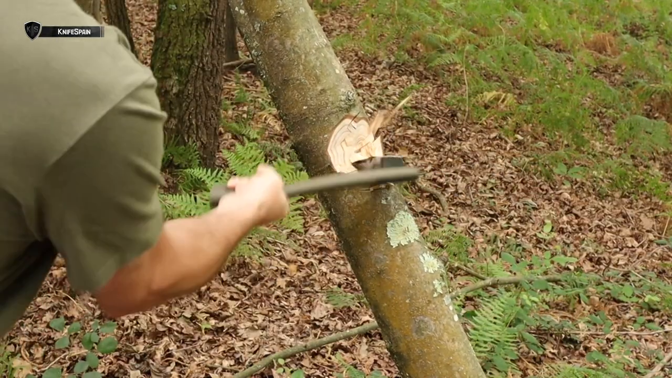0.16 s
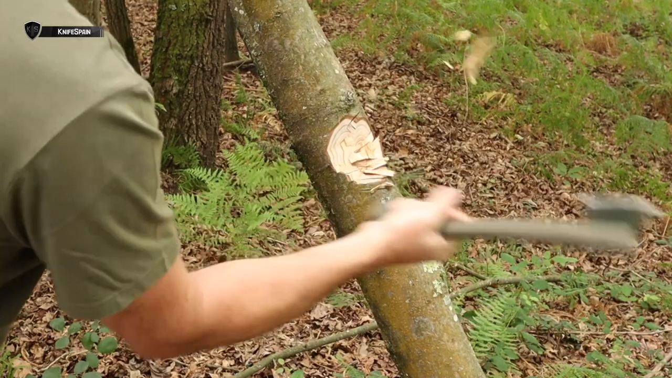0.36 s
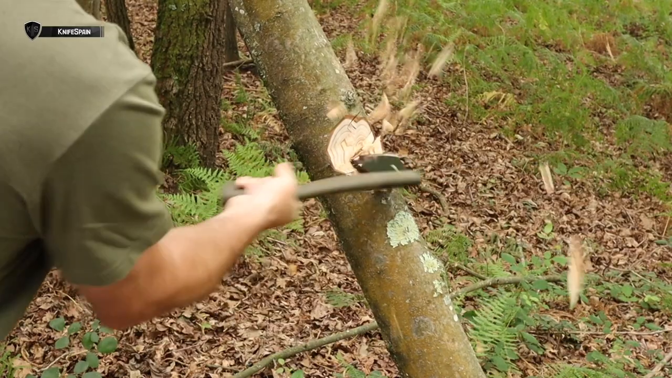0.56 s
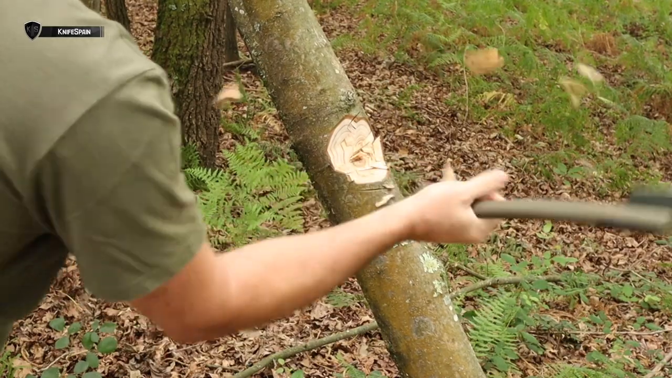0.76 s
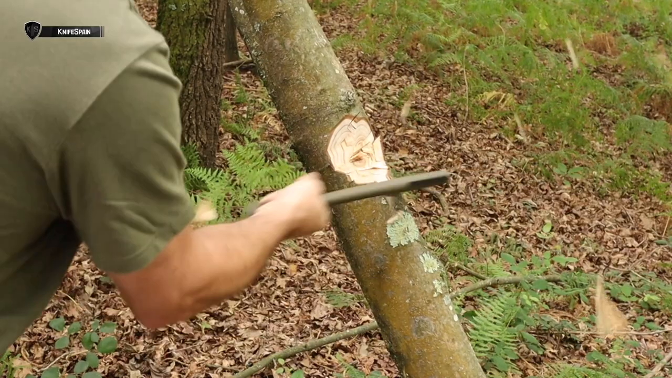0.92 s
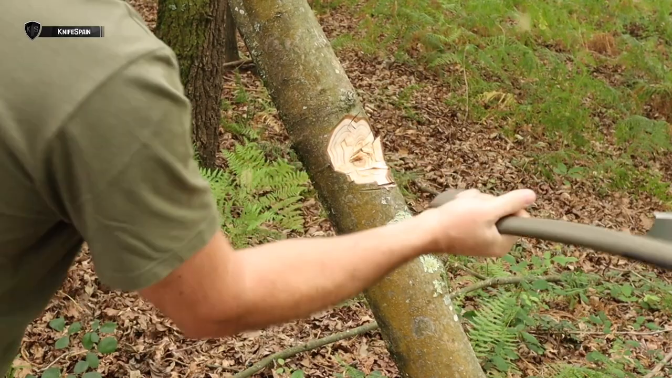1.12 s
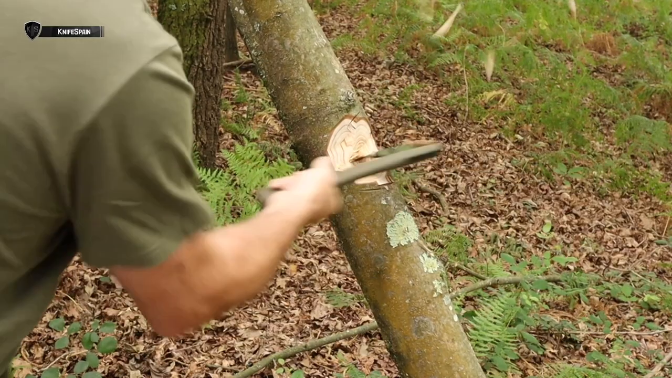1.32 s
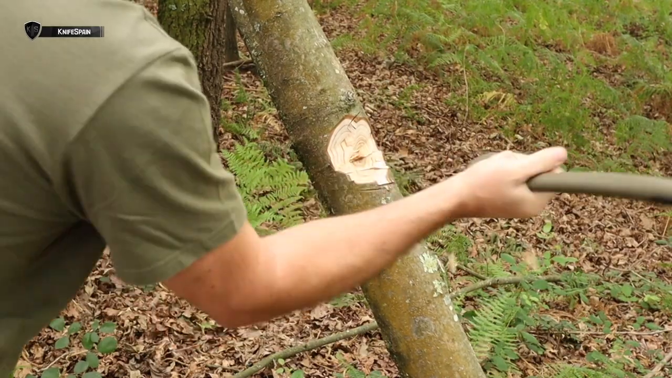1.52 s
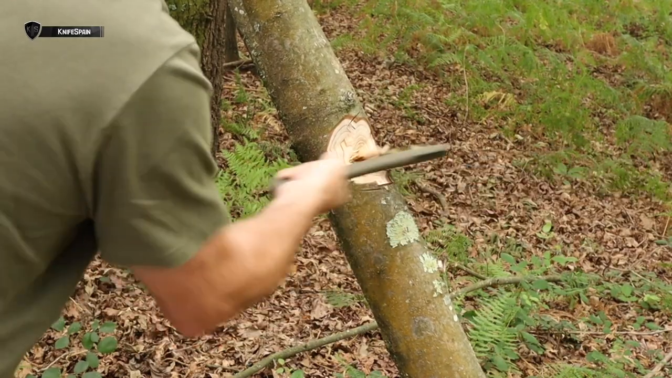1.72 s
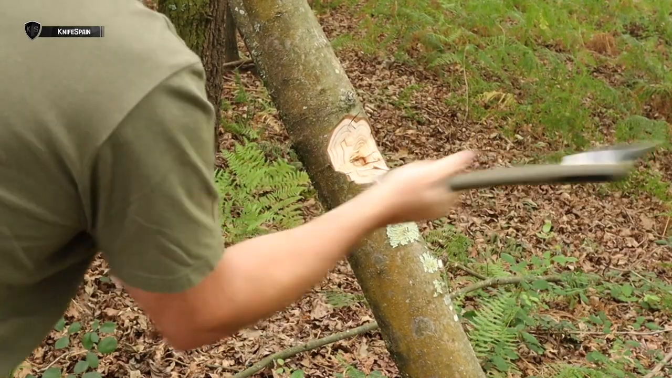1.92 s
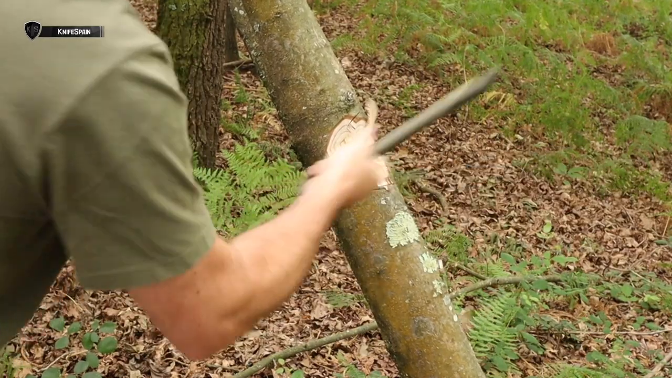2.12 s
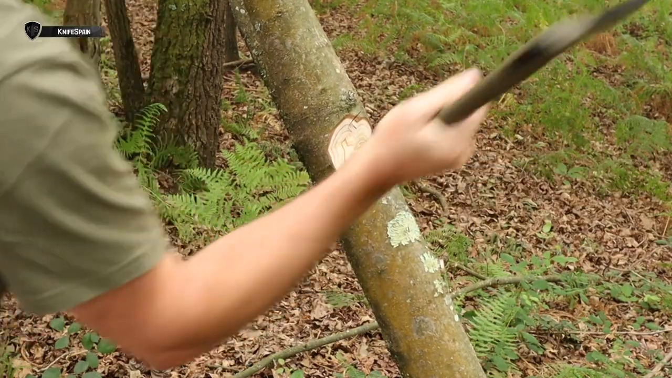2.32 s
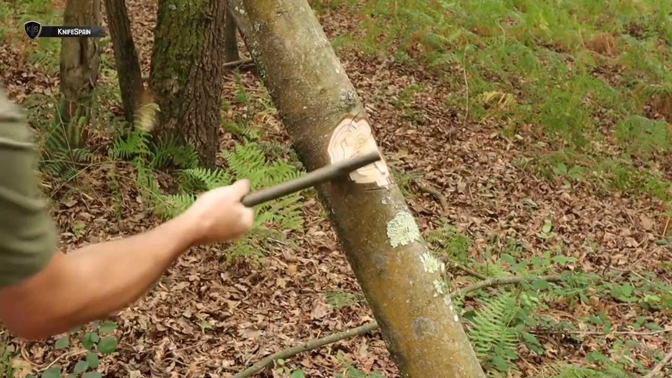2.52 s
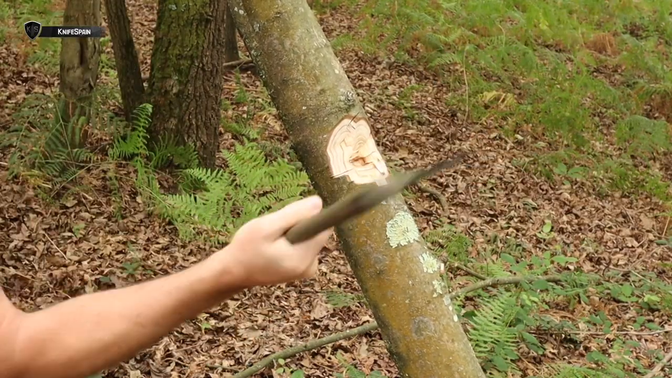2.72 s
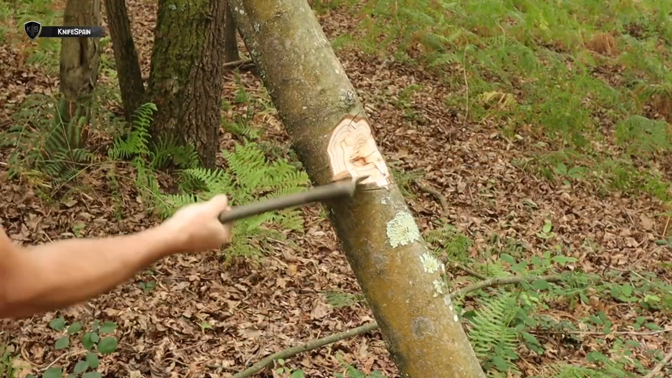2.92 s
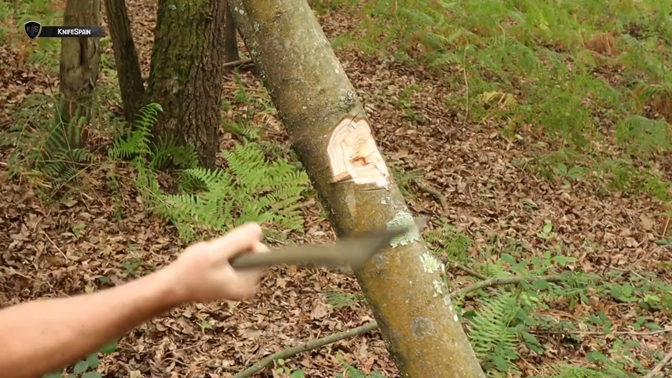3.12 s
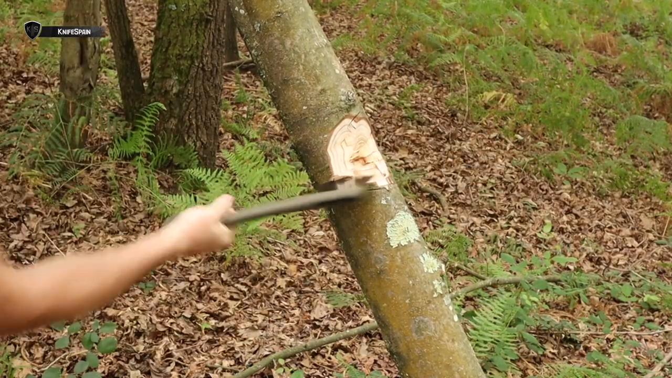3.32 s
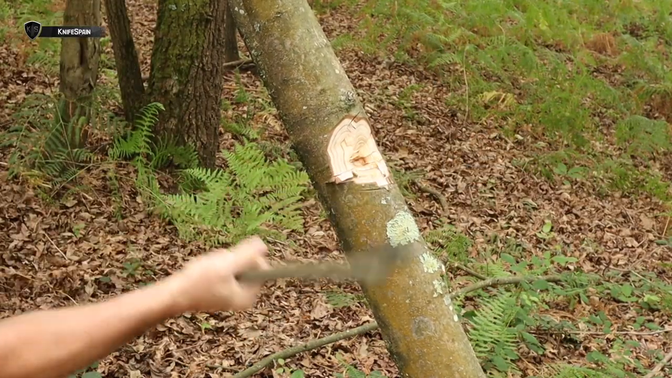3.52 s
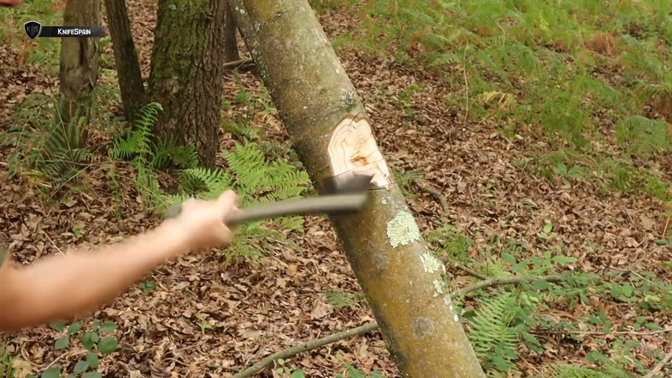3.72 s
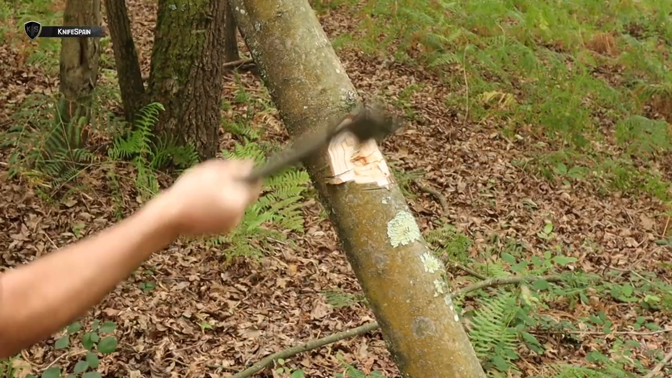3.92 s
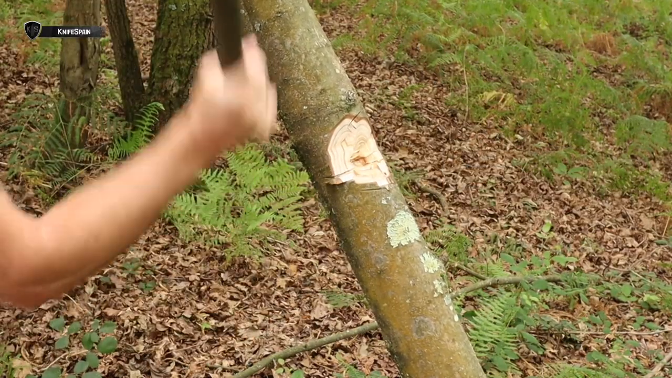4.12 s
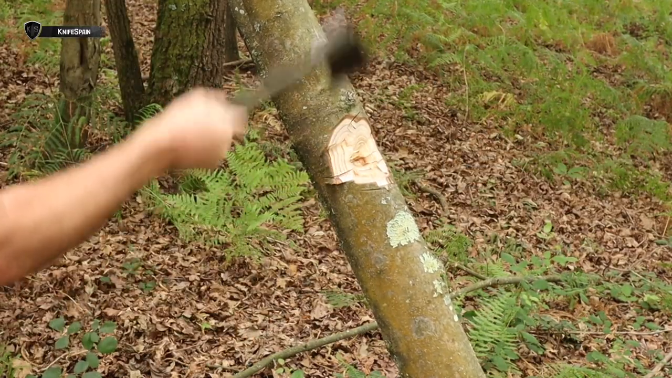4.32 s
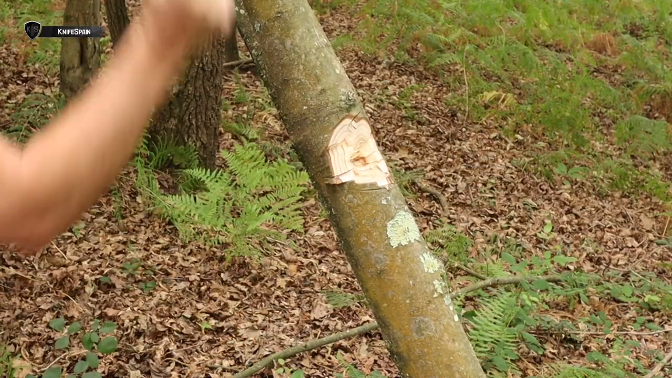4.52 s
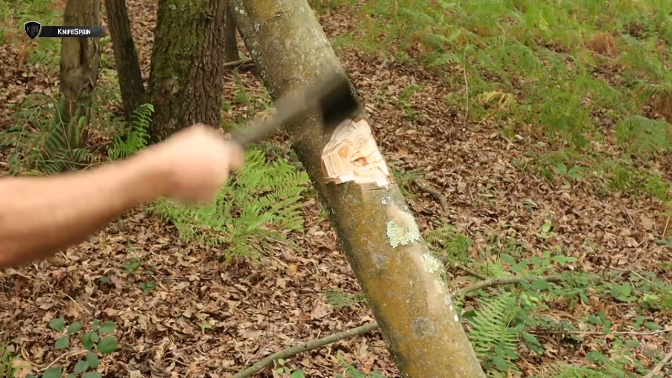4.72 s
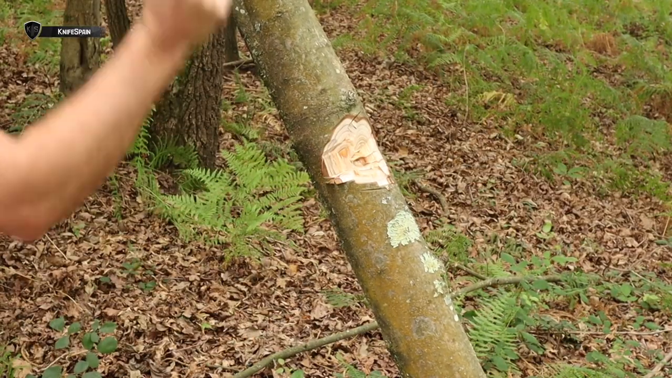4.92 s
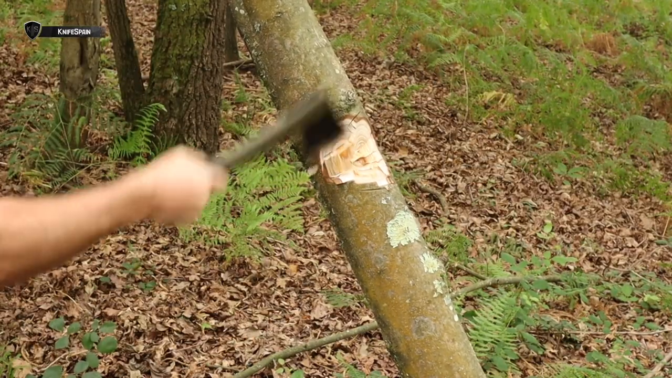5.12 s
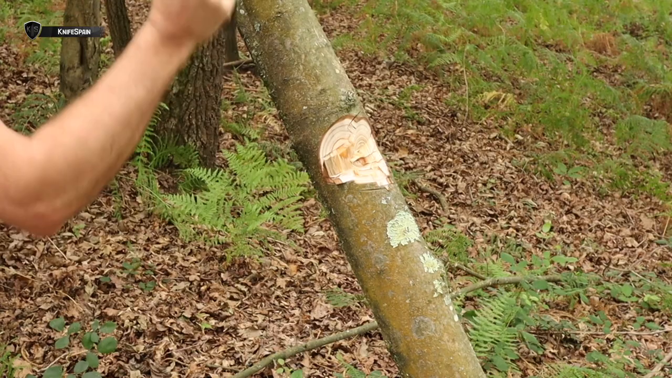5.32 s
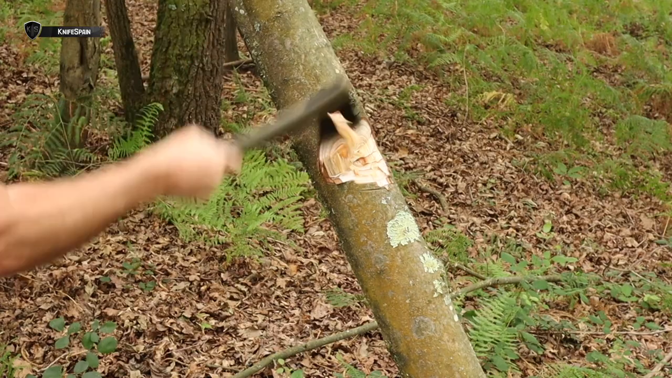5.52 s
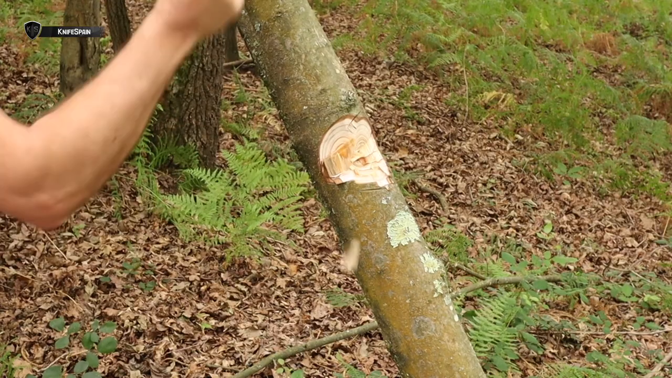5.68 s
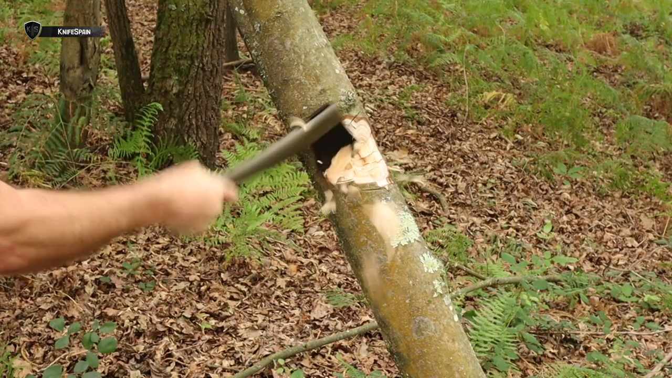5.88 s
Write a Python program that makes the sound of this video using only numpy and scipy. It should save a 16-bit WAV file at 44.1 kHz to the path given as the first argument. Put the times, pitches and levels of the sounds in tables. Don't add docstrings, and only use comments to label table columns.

```python
import sys
import numpy as np
from scipy import signal
from scipy.fft import rfft, irfft, next_fast_len
from scipy.io import wavfile
from scipy.ndimage import uniform_filter1d

SR = 44100
rng = np.random.default_rng(int(sys.argv[2]) if len(sys.argv) > 2 else 0)


def dump_mix(stems):
    frames = np.atleast_2d(stems).T
    limited = np.clip(frames, -1, 1)
    pcm = np.round(limited * 32767).astype(np.int16)
    wavfile.write(sys.argv[1], SR, pcm)


def amplitude_ratio(level_db):
    exponent = np.asarray(level_db, float) / 20
    return 10 ** exponent


N = 262395
TREES_RISE_S = 0.025
SIDES = np.array([[1], [-1]])


def band(x, lo_hz, hi_hz):
    sos = signal.butter(2, [lo_hz, min(hi_hz, 0.45 * SR)], "band", fs=SR, output="sos")
    return signal.sosfilt(sos, x)


def peak(x, db):
    return x * amplitude_ratio(db) / np.abs(x).max()


def ring(modes, scatter_db, size=7000):
    hz, db, t60 = np.transpose(modes)[:, :, None]
    chance = rng.standard_normal((2, len(modes), 1))
    t = np.arange(size) / SR
    strength = amplitude_ratio(db + scatter_db * chance[0])
    tone = np.sin(2 * np.pi * hz * (1 + 0.027 * chance[1]) * t)
    fade = 1000.0 ** (-t / np.abs(t60))
    return (strength * tone * fade).sum(0)


def walk(rate):
    k = int(SR / rate)
    steps = np.repeat(rng.standard_normal(N // k + 1), k)
    slow = uniform_filter1d(uniform_filter1d(steps, k), k)[:N]
    return slow / slow.std()


def add(out, s, sound, pan_db):
    i = int(s * SR)
    n = min(sound.shape[-1], N - i)
    out[:, i:i + n] += sound[..., :n] * amplitude_ratio(pan_db * SIDES / 2)


def hush(colour, db):
    # t/s, level/dB
    rustle = [
        (0.0, -50),
        (0.45, -60),
        (1.101, -50),
        (1.899, -60),
        (2.501, -56.5),
        (3.2, -64.5),
        (5.95, -66.5),
    ]
    out, (hz0, db0) = 0, np.transpose(colour)
    breeze = np.interp(np.arange(N) / SR, *np.transpose(rustle)) + 62
    for hz in 30 * 2 ** np.arange(0, 9.1, 0.5):
        gain_db = np.interp(np.log(hz), np.log(hz0), db0)
        gain_db = gain_db + breeze * min(hz / 14000.0, 1) + 0.2 * walk(5.6)
        out = out + amplitude_ratio(gain_db) * band(rng.standard_normal(N), hz / 1.19, hz * 1.19)
    return out * amplitude_ratio(db) / out.std()


def wood_hush():
    # f/Hz, level/dB per Hz
    middle_colour = [(15, -33), (25, 4.5), (67, 7), (172, -4), (621, 0), (709, -4.5), (952, -3),
                     (6720, -24), (8550, -16), (10900, -18), (11800, -26), (12800, -58), (15000, -63.5)]
    # f/Hz, level/dB per Hz
    side_colour = [(15, -61), (25, -22), (135, -14.5), (501, -7.5), (978, -5), (2300, -6.5), (2850, -9),
                   (8780, -12.5), (10900, -8.5), (13100, -10), (15000, -42.5)]
    return hush(middle_colour, -56.5) + hush(side_colour, -57) * SIDES


def dove():
    # t/s, length/s, start f/Hz, end f/Hz, level/dB
    coos = [
        (1.011, 0.246, 600, 645, -57),
        (3.293, 0.14, 526, 684, -50),
        (3.449, 0.23, 623, 656, -56),
        (4.694, 0.12, 577, 686, -52.5),
        (5.404, 0.086, 555, 666, -50.5),
        (5.557, 0.26, 630, 614, -61.5),
    ]
    out = np.zeros((2, N))
    for s, length, from_hz, to_hz, db in coos:
        u = np.linspace(0, 1, int(length * SR))
        hz = from_hz + (to_hz - from_hz) * np.sin(np.pi / 2 * u)
        whistle = np.sin(2 * np.pi * np.cumsum(hz) / SR)
        add(out, s, amplitude_ratio(db) * np.sin(np.pi * u) ** 1.3 * whistle, 0)
    return out


def chips():
    # t/s, peak level/dB, length/ms, left minus right/dB
    landings = [(0.0423, -45, 9.5, 4), (0.5217, -52, 8.6, 9), (0.915, -41.5, 3.6, -6),
                (1.051, -35.5, 5.2, -11.5), (1.1304, -44.5, 7.2, 0), (1.183, -36.5, 8.8, -10),
                (1.2233, -42, 6.5, -8), (1.2531, -45.5, 4.6, -13.5), (1.626, -38.5, 4.7, -9),
                (1.8046, -32.5, 8, -3), (1.908, -50.5, 6.8, 0), (2.3144, -45, 13, -1),
                (2.4242, -42.5, 7.3, -1), (2.4354, -40, 14, -2), (2.7134, -45.5, 12.4, 12),
                (2.7915, -40, 26, 0.6), (2.8433, -32, 5.2, 1), (3.995, -53, 2.9, -5),
                (4.0267, -45.5, 11.8, 11), (4.6407, -34.5, 9.3, -1), (5.004, -48, 6.0, 5),
                (5.034, -47.5, 8.3, -6), (5.0549, -45, 6.9, -1), (5.1886, -41.5, 6.5, 8),
                (5.251, -52, 2.9, 0), (5.288, -46.5, 4.9, -4.5), (5.3192, -43, 8, -2.5),
                (5.4122, -37, 18, -2), (5.454, -39, 17, 0.5), (5.6345, -45, 2.6, -0.5)]
    usual_hz, octaves_per_10_db, spread_octaves = 3120, 0.97, 0.17
    out, ms = np.zeros((2, N)), np.arange(2000) * 1000 / SR
    for s, db, length_ms, pan_db in landings:
        octaves = octaves_per_10_db * (db + 38) / 10 + spread_octaves * rng.standard_normal()
        hz = usual_hz * 2 ** octaves
        crackle = rng.standard_normal((2, 2000)) * amplitude_ratio(3.2 * rng.exponential(size=2000))
        crackle = crackle[0] + 0.67 * crackle[1] * SIDES
        crackle = band(crackle, hz / 2, hz * 2) + 0.5 * band(crackle, 900, 10000)
        fade = (1 - np.exp(-ms / 0.18)) * np.exp(-ms / max(length_ms, 0.5))
        add(out, s - 0.001, peak(fade * crackle, db + 7.0), pan_db)
    return out


def bites():
    # t/s, splitting level/dB, trunk ring level/dB, split f/Hz, trunk f/Hz
    full_bites = [(0.2063, -2, -13, 2500, 697), (0.5781, -11, -13, 2664, 640), (0.95, -1.5, -4, 2377, 645),
                  (1.3125, -1, -6, 2863, 613), (1.7081, -2, -7.5, 2807, 1216), (2.0657, -3, -11, 3815, 972),
                  (2.5405, -4.5, -2, 2760, 619), (2.9637, -2, -9.5, 3866, 910), (3.3908, -5, -3, 1560, 624),
                  (3.7931, -8, -6.5, 2760, 624), (4.256, -3.5, -6.5, 2410, 1245),
                  (4.6695, -15, -24.5, 3035, 619), (5.0836, -3.5, -10, 3615, 1270),
                  (5.4964, -5, -20.5, 3125, 617), (5.9006, -8, -7.5, 1983, 897)]
    # t/s, splitting level/dB, trunk ring level/dB, split f/Hz, cut length/ms
    skips = [
        (0.573, -19.5, -13.5, 2724, 1.3),
        (.5752, -12, -29, 3380, 2),
        (0.5813, -14.5, -22.5, 2750, 2.1),
        (4.6678, -11.5, -15.5, 2130, .9),
        (4.6704, -1, -20.5, 3580, 3),
        (5.4936, -6.5, -8.5, 2087, .9),
        (5.894, -5, -7, 2110, .9),
        (5.0965, -26.5, -32, 4660, 1.2),
    ]
    # t/s, steepness 0-1
    swing = [
        (3.9, 0.02),
        (4.3, 0.4),
        (5.0, 1),
        (5.5, 0.94),
    ]
    rows = []
    for s, split, trunk, hz, trunk_hz in full_bites:
        rows.append((s, split, trunk, 2.15, hz, trunk_hz, -22, -12.5))
    for s, split, trunk, hz, cut_ms in skips:
        trunk_hz = 1120 if cut_ms < 1.5 else 624
        rows.append((s, split, trunk, cut_ms, hz, trunk_hz, -17, -12.5))
    s, split, trunk, cut_ms, hz, trunk_hz, scrape, echo = np.transpose(rows)
    steep = np.interp(s, *np.transpose(swing))
    edge = split - 1.5 + 5 * np.log2(hz / 2520)
    thud = trunk - 16 - 20 * steep
    echo = echo - 5 * steep
    return np.transpose([s, edge, split, trunk, thud, cut_ms, hz, trunk_hz, scrape, echo])


def trees():
    # f/Hz, level/dB, early t60/s, late level/dB, late t60/s, side minus mid/dB
    broad = [(93, -25.5, 0.056, -13, 0.87, -5.5), (200, -34, 0.42, -22.5, .8, -14),
             (457, -34, 0.3, -14, 0.59, -14), (930, -32.5, 0.08, -9, 0.83, -4),
             (1800, -41.5, 0.42, -18.5, 0.86, 2.5), (4100, -39.5, 0.21, -6, 0.83, 4),
             (6950, -41, 0.58, -14, 0.2, 4), (11000, -43, 0.1, -14, 1, 13.5)]
    # f/Hz, level/dB, early t60/s, late level/dB, late t60/s, side minus mid/dB
    narrow = [(622, -40.5, .4, -10, 1.5, -9.5), (950, -45.5, 0.21, -6, 0.82, -3.5),
              (3140, -49, 0.3, -18, 0.5, 3)]
    t, echo = np.arange(int(0.9 * SR)) / SR, 0
    layer_hz = np.log([9000, 2800, 800, 200])
    bands = [(1.45, *row) for row in broad] + [(1.07, *row) for row in narrow]
    lumps = 1.5 * walk(70)
    touches = bites()
    for ratio, hz, db, early, late_db, late, side_db in bands:
        rise = 1 - np.exp(-(t / TREES_RISE_S) ** 2)
        fade = rise * (1000.0 ** (-t / early) + amplitude_ratio(late_db) * 1000.0 ** (-t / late))
        power = np.zeros((2, N))
        for bite in touches:
            colour_db = np.interp(-np.log(hz), -layer_hz, bite[1:5])
            add(power, bite[0], (fade * amplitude_ratio(bite[-1] - 3.0 + 0.75 * colour_db)) ** 2, 0)
        mid, side = band(rng.standard_normal((2, N)), hz / ratio, hz * ratio)
        gain = amplitude_ratio(db + 15 + lumps + 0.76 * walk(30)) * np.sqrt(power)
        echo = echo + gain * (mid / mid.std() + amplitude_ratio(side_db) * side / side.std() * SIDES)
    return echo


def sing():
    width, t60_s = 1.12, 0.36
    out, t = np.zeros((2, N)), np.arange(int(0.4 * SR)) / SR
    fade = (1 - np.exp(-(t / TREES_RISE_S) ** 2)) * 1000.0 ** (-t / t60_s)
    for s, _, split, _, _, _, hz, _, _, echo in bites():
        mid, side = band(rng.standard_normal((2, len(t))), hz / width, hz * width)
        wash = (mid + 0.7 * side * SIDES) / mid.std()
        add(out, s, amplitude_ratio(-43.5 + 14.5 + echo + split) * fade * wash, 0)
    return out


def undergrowth():
    ms = np.arange(2500) * 1000 / SR
    near = amplitude_ratio(-36.5) * rng.standard_normal((2, 2500)) * (ms > 1.2) * np.exp(-ms / 7.2)
    near[:, 0] = 1
    return near


def ports(x):
    share, turn_hz = 0.42, 1500
    size = next_fast_len(N)
    hz = np.arange(size // 2 + 1) * SR / size
    side = irfft(rfft(x.mean(0), size) * 1j * share * hz / (hz + turn_hz), size)[:N]
    return x + side * SIDES


def blow(edge_db, split_db, trunk_db, thud_db, cut_ms, split_hz, trunk_hz, scrape_db, size=7000):
    # f/Hz, level/dB, t60/s
    trunk_modes = [(402, -10.5, 0.061), (477, -24.5, 0.015), (619, -10, 0.038), (720, -12.5, .04),
                   (892.5, -11.5, 0.029), (957.5, -10.5, 0.051), (1225, -5.5, 0.017), (1497, -16.5, 0.058)]
    # f/Hz, level/dB, t60/s
    split_modes = [(1874, -21.5, 0.011), (2390, -18.5, 0.0024), (2750, -9, 0.007), (3110, -14.5, 0.025),
                   (3760, -6, 0.0051), (4410, -16.5, 0.0026), (4973, -16.5, 0.019)]
    # f/Hz, level/dB, t60/s
    thud_modes = [(89, -8, 0.04), (123.9, -2.5, 0.12), (160, -4, .06), (180.1, 1.5, 0.14),
                  (214, 6.5, 0.062), (263, -12.5, .04), (290, -5.5, 0.042), (72.6, -12.5, 0.66)]
    ms, cut = np.arange(size) * 1000 / SR, max(cut_ms, 0.3)
    bite = np.where(ms < cut, (ms / cut) ** 2.1, np.exp(-(ms - cut) / 1.1))
    bite = bite + amplitude_ratio(scrape_db) * np.exp(-ms / 3.5) * (ms > cut)
    snaps = bite * rng.standard_normal((2, size)) * amplitude_ratio(3.9 * rng.exponential(size=size))
    snaps = snaps[0] + 0.14 * snaps[1] * SIDES
    push = np.exp(-((ms - 1.0325 * cut) / 0.041) ** 2) + 0.1 * snaps.sum(0) / np.abs(snaps).max()
    push = push + 0.068 * rng.standard_normal(size) * (ms > cut) * np.exp(-ms / 14.6)
    split_knock = [(split_hz, 2, 0.0032)]
    trunk_knock = [(trunk_hz, 3, 0.009), (1.8 * trunk_hz, 0, 0.005)]
    split = band(ring([*split_modes, *split_knock], scatter_db=3), 1200, 9000)
    trunk = band(ring([*trunk_modes, *trunk_knock], scatter_db=3), 0.53 * trunk_hz, 5000)
    thud = band(ring(thud_modes, scatter_db=4.5), 170.0, 730.0)
    jolt = band(band(push, 77.0, 220.0), 77.0, 220.0)
    layers = [peak(band(snaps, 5200.0, 11500.0), edge_db),
              peak(signal.fftconvolve(snaps, split[None], axes=1), split_db),
              peak(signal.fftconvolve(push, trunk), trunk_db),
              peak(signal.fftconvolve(push, thud), thud_db),
              peak(band(snaps, 1700.0, 4200.0), split_db - 10.5),
              peak(jolt, trunk_db - 30.5)]
    return sum(x[..., :size] for x in layers)


def axe():
    near = np.zeros((2, N))
    for s, edge, split, trunk, thud, cut_ms, split_hz, trunk_hz, scrape, _ in bites():
        hit = blow(edge + 4, split + 3, trunk + 4, thud + 4, cut_ms, split_hz, trunk_hz, scrape)
        add(near, s + 0.0015 - cut_ms / 1000, hit, 0)
    lag = int(4.5 * SR / 1000)
    late = np.pad(near, ((0, 0), (lag, 0)))[:, :N]
    near = near + amplitude_ratio(-14) * band(late, 300.0, 1700.0)
    scattered = signal.fftconvolve(near, undergrowth(), axes=1)[:, :N]
    return ports(scattered) + trees() + sing()


def scene():
    return wood_hush() + dove() + chips() + axe()


def starve(x, size=24):
    # f/Hz, middle 0-1, sides 0-1
    dropped = [(4000, 0, 0), (5700, .08, 0), (7000, .2, .01), (8300, .33, .01), (9600, .2, .01),
               (11200, .4, .02), (12300, .9, .2), (14000, 1, .9), (15000, 1, 1)]
    safe_db = -56
    hz, _, z = signal.stft(np.array([x[0] + x[1], x[0] - x[1]]) / 2, SR, nperseg=1024)
    starts = np.arange(0, len(hz), size // 2)
    edge_hz, *shares = np.transpose(dropped)
    db = 10 * np.log10(np.add.reduceat(np.abs(z) ** 2, starts, axis=1) + 1e-18)
    short = rng.standard_normal(db.shape) + 0.9 * rng.standard_normal((2, 1, db.shape[2]))
    short = uniform_filter1d(short, size=6, axis=2)
    rank = short.argsort(axis=2).argsort(axis=2) / db.shape[2]
    share = np.array([np.interp(hz[starts], edge_hz, s) for s in shares])[:, :, None]
    treble = db[:, hz[starts] > 5000].mean(axis=(0, 1))
    tick = (treble - np.roll(treble, 2) > 2.5) & (hz[starts] < 15000)[:, None]
    keep = (rank >= share) | (db > safe_db) | tick
    kept = z * keep[:, np.arange(len(hz)) // (size // 2)]
    mid, side = signal.istft(kept, SR, nperseg=1024)[1][:, :N]
    return np.array([mid + side, mid - side])


def band_limit(x):
    return signal.sosfilt(signal.butter(12, 16490, fs=SR, output="sos"), x)


def record(dry):
    overload = 0.93
    heard = np.clip(band(dry, 20.0, 19000.0), -overload, overload)
    heard = signal.sosfilt(signal.butter(3, 14500, fs=SR, output="sos"), heard)
    return band_limit(starve(heard))


dry = scene()
out = record(dry)
dump_mix(out)
```